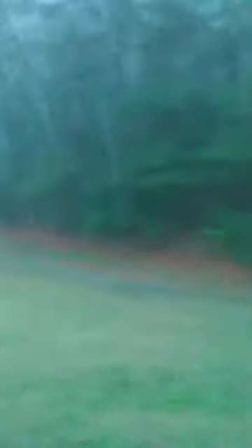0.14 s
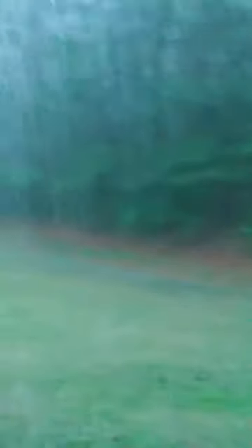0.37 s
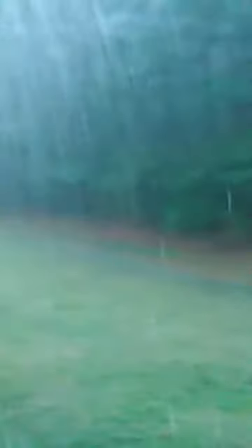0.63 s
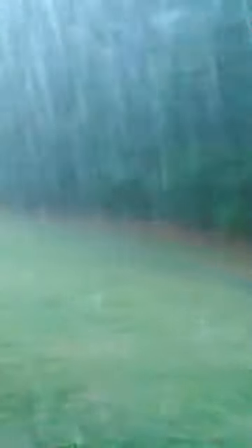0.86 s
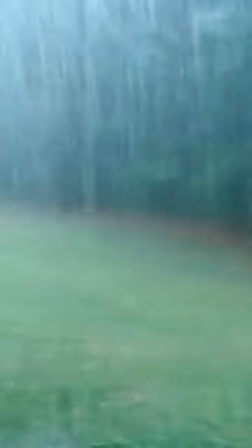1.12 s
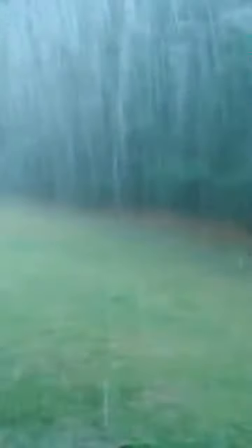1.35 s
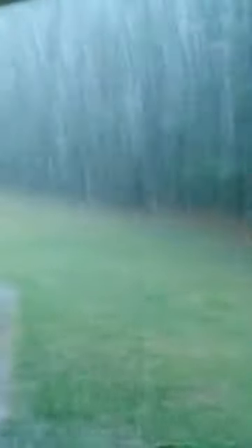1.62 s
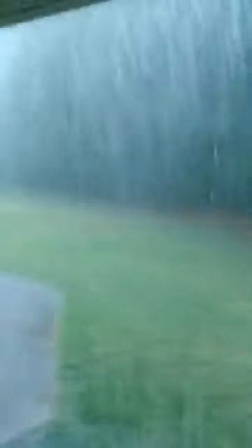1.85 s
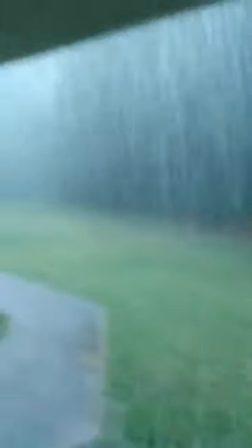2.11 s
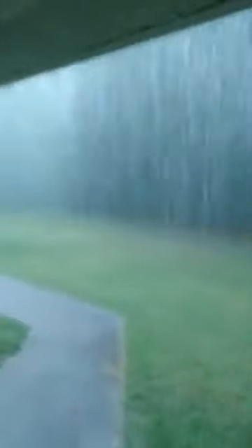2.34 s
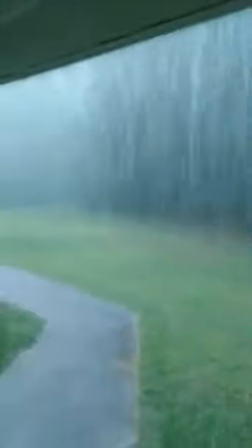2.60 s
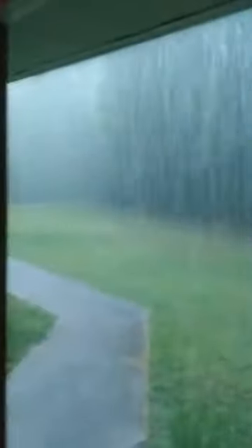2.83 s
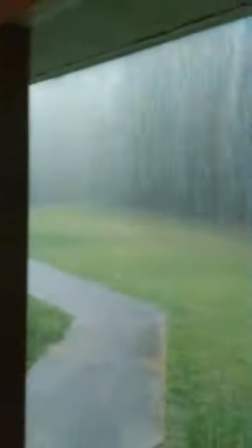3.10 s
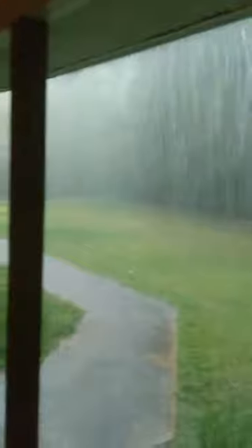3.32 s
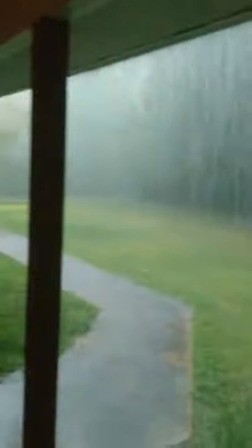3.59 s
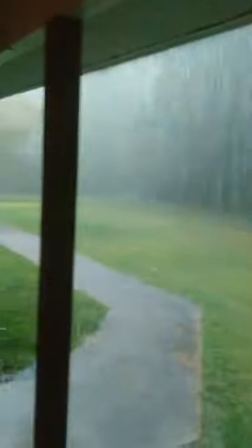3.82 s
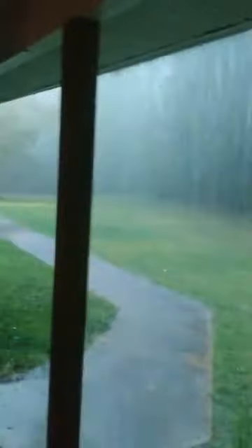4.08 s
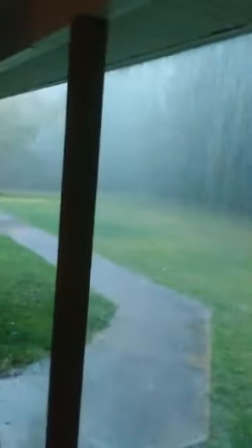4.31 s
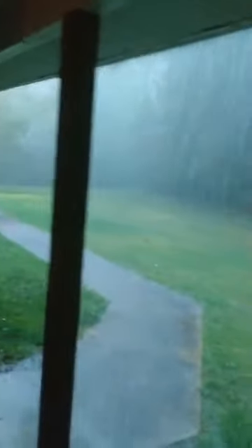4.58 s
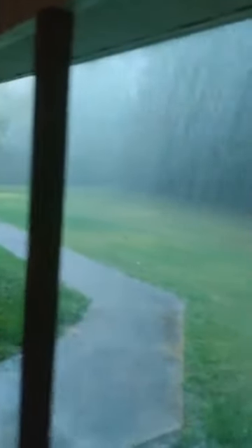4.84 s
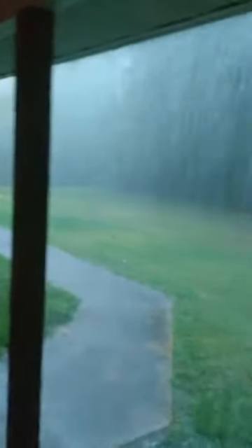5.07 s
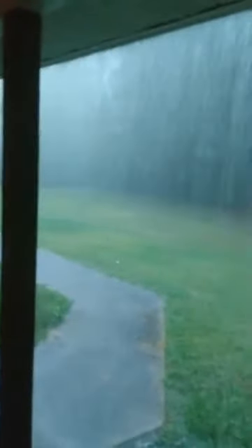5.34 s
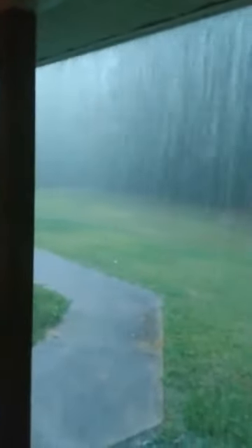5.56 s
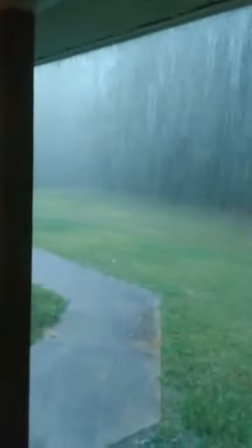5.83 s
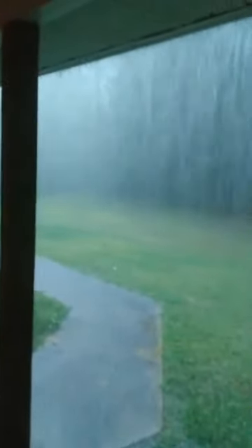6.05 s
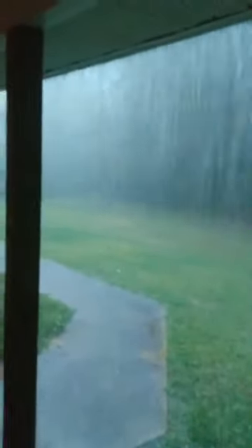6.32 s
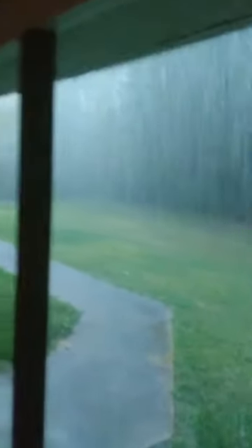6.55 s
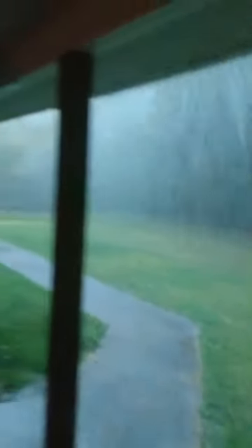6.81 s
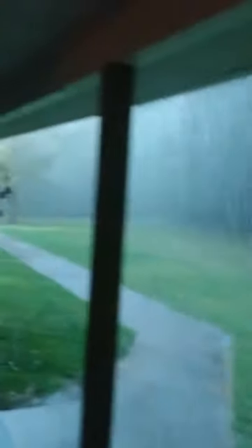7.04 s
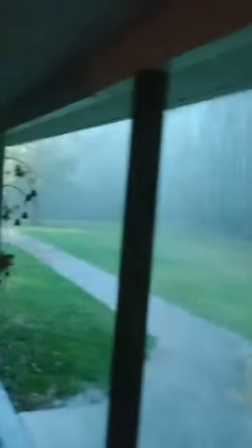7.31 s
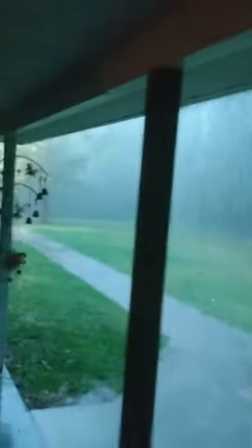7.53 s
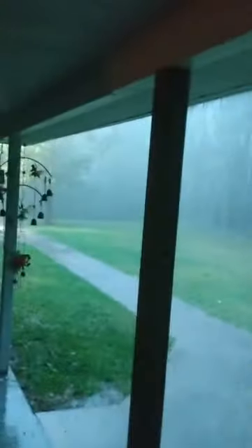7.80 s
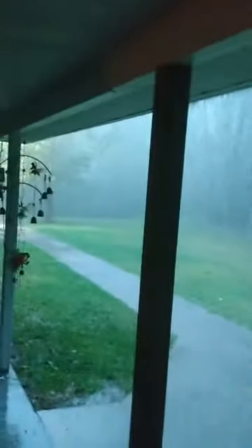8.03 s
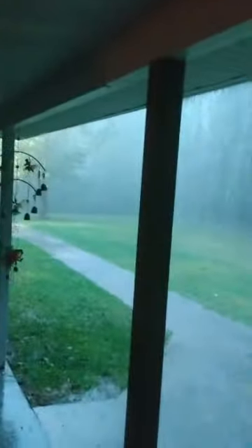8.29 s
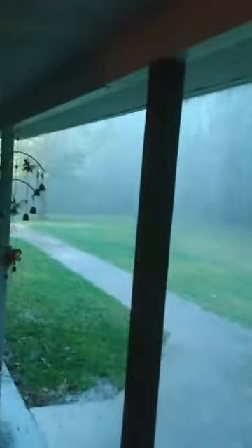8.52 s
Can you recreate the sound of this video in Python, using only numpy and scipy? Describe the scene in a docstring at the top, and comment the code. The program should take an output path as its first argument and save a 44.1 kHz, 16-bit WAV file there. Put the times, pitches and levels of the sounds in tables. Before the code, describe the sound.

A steady, loud downpour falls on grass, a paved path and trees, heard by a small handheld microphone under a porch roof. The dense bright hiss changes colour gradually as the microphone turns from open lawn to along the porch. Scattered close drops splat, faint ticks poke through, and two dull eaves drips fall early. Low wind buffets lightly, then thumps harder in the last second.

```python
"""Heavy rain from a porch

Heavy rain on a lawn, a path and trees, heard by one small microphone feeding two equal channels.
Far drops are noise, nearer ones random clicks; their hiss is recoloured as the microphone turns from lawn to porch.
Close drops, eaves drips and faint short ticks within the hiss are resonated noise bursts.
Wind on the microphone port is low noise with gusts and short swings, hardest near the end."""
import sys
import numpy as np
from scipy import signal
from scipy.fft import rfft, irfft, next_fast_len
from scipy.io import wavfile
from scipy.ndimage import uniform_filter1d

SR = 44100
rng = np.random.default_rng(int(sys.argv[2]) if len(sys.argv) > 2 else 0)


def linear_from_db(decibels):
    """Turn decibels (scalar or array-like) into linear amplitude factors; 0 gives 1."""
    return 10 ** (np.asarray(decibels, float) / 20)


def master(y):
    """Save y as 16-bit WAV."""
    cut = np.clip(np.atleast_2d(y).T, -1, 1)
    pcm = np.round(cut * 32767)  # scale
    wavfile.write(sys.argv[1], SR, pcm.astype(np.int16))


N = 381906

# Downpour. Each row: time in seconds, level in dB.
RAIN_LEVEL = [(0.0, -16), (1.76, -16.5), (6.46, -17.5), (7.45, -18), (8.59, -18), (8.66, -19.5)]
# Microphone heading. Each row: time in seconds, heading from 0 (open lawn) to 1 (along the porch).
MIC_HEADING = [(0, 0.02), (.5, 0.053), (1, 0.29), (1.5, 0.48), (2.5, 0.62), (4, 0.76), (6, 0.83), (8.66, 1)]
# Hiss colour facing the lawn. Each row: frequency in Hz, relative density in dB per Hz.
LAWN_COLOUR = [(190, -14), (330, -15.5), (630, -14), (1100, -10), (1700, -6), (2030, -1), (3100, -2),
               (4500, -3), (7900, -4), (8700, -3), (10000, -3.5), (11400, -3.5), (13200, -0.5),
               (14300, -1.5)]
# Hiss colour along the porch. Each row: frequency in Hz, relative density in dB per Hz.
PORCH_COLOUR = [(190, -34.5), (290, -18), (370, -20), (445, -16.5), (680, -13.5), (1450, -9), (1800, -4.5),
                (2300, 0.5), (2950, -2), (4200, -5.5), (7000, -6.5), (8000, -3.5), (9300, 1), (10400, -2),
                (12700, -3), (13800, -2.5), (14300, -7.5)]
# Narrow peaks and notches of the microphone port.
# Each row: centre in Hz, width in Hz, gain in dB facing the lawn, gain in dB along the porch.
PORT_RESONANCES = [(3060, 120, -1, -3), (3780, 110, -.5, -3.5), (4290, 140, -.5, -3),
                   (4560, 170, -.5, -3.3), (5280, 200, -.5, -1.3), (5770, 130, -1, -2.3),
                   (6050, 110, -1, -3), (6850, 160, -1, -1.5), (7560, 150, 0, -3.5), (8430, 260, -3.5, -2),
                   (9080, 300, -2.5, .5), (9580, 400, 4.5, 2.5), (9850, 120, -1.5, -3.5),
                   (10050, 150, -2, -3), (10520, 100, 0, -2), (11030, 100, -1, -2.5), (11350, 200, -1, -2),
                   (11870, 150, -2, -2), (12550, 140, -1.5, -2), (12800, 120, 0, -2.5),
                   (13550, 150, -.5, -2.5)]
# Thinning of the low body of the hiss. Each row: time in seconds, relative gain in dB.
LOW_BODY_GAIN = [(0, 0), (1.7, 1), (2.2, -2.5), (2.9, 0), (3.4, 0), (3.6, -6.5), (3.85, 0), (4.35, 0),
                 (4.6, -6), (4.8, 2), (5.1, -6), (5.3, 2), (5.75, -4), (6.0, -1), (6.3, -3), (6.5, -11),
                 (7.9, -11), (8.05, -3), (8.2, -9), (8.3, -3), (8.66, -4)]
# Colour level under which a narrow band drops out, before the margin shifts.
# Each row: frequency in Hz, level in dB against the mean of the hiss.
DROPOUT_LEVEL = [(280, -23), (400, -21), (500, -22), (1400, -13), (3000, -5), (7000, -4.5), (9000, -5),
                 (14000, -4.5)]
# Big drops landing close by. Each row: start in seconds, peak in dB before trim, ring in Hz.
CLOSE_DROPS = [(0.88, -6, 2400), (2.3155, -12, 2130), (2.754, -6, 2500), (3.144, -4, 2150),
               (3.9434, -7, 2340), (4.311, -6, 2220), (4.4139, -4, 2200), (5.21, -18, 3400),
               (6.08, -7, 2410), (6.9136, -3, 2550), (7.9134, -2.5, 2330), (8.154, -8, 2400),
               (8.236, -9, 2600), (8.54, -15, 2400)]
# Heavy, duller drips from the eaves. Each row: start in seconds, peak in dB before trim, ring in Hz.
EAVES_DRIPS = [(0.798, -20, 1000), (1.510, -17, 740)]
# Faint short ticks within the hiss, 3 to 7 kHz.
# Each row: start in seconds, peak in dB before trim, ring in Hz.
FAINT_TICKS = [(0.0947, -10, 4430), (0.5442, -12, 4840), (0.6799, -13, 3320), (0.7332, -12, 3650),
               (1.5454, -13, 4910), (1.8542, -14, 3490), (2.0303, -19, 4050), (2.1884, -9, 6890),
               (2.3496, -10, 3500), (2.9302, -15, 3280), (3.2201, -12, 4780), (3.3533, -15, 3000),
               (3.492, -6, 5090), (3.8282, -15, 5680), (4.3725, -15, 3990), (5.1382, -21, 3220),
               (5.3961, -13, 3240), (5.5832, -16, 3540), (5.8616, -12, 3580), (6.0392, -16, 5080),
               (6.098, -14, 3280), (6.7481, -13, 3020), (6.8643, -8, 3280), (7.3103, -16, 3500),
               (7.4689, -16, 3210), (7.5647, -9, 4100), (8.1539, -15, 6510), (8.3464, -16, 3580),
               (8.5405, -16, 3280), (8.6138, -18, 3550)]
# Steady wind on the port, before random swings.
# Each row: time in seconds, rumble level in dB, flutter in dB over the rumble.
STEADY_WIND = [(0.0, -55.5, 12.5), (1.2, -56.5, 7.5), (2.6, -51.5, 3.5), (4.2, -53.5, 3.5), (4.9, -52, 5),
               (5.3, -49, 0), (5.55, -61, 12), (5.76, -60, 0), (5.85, -50, 2), (6.3, -57, 5.5),
               (6.6, -47.5, -6), (6.9, -57, 1), (7.6, -50.5, -12), (8.66, -56, -17)]
# Buffeting colour. Each row: frequency in Hz, relative density in dB per Hz.
BUFFET_COLOUR = [(15, -50), (30, -18), (69, 0.5), (125, 2), (142, -7), (178, -5), (230, -8.5), (265, -17.5),
                 (340, -53), (730, -120)]
# Gusts reaching under the roof, before random swings.
# Each row: time of full strength in seconds, hold in seconds, rumble level in dB.
GUST_EVENTS = [(7.667, 0.1, -44), (7.993, 0.2, -47), (8.26, 0.094, -44), (8.5, 0.14, -41.5)]
# Single eddies thumping the port. Each row: start in seconds, peak in dB, frequency in Hz.
EDDY_THUMPS = [(2.309, -43, 153), (5.155, -35, 80), (5.285, -34, 105), (5.81, -36, 95), (5.965, -39, 85),
               (6.668, -30, 88.8), (7.674, -30, 157), (7.688, -30, 170), (7.719, -20.5, 96),
               (7.752, -33, 140), (7.79, -24, 113), (7.998, -29, 111), (8.044, -30, 144), (8.072, -33, 120),
               (8.105, -31, 85), (8.142, -32, 125), (8.254, -30, 134), (8.308, -24, 145), (8.324, -19, 135),
               (8.327, -27, 242), (8.354, -23, 108), (8.408, -37, 140), (8.497, -25, 100), (8.51, -39, 240),
               (8.517, -28, 118), (8.55, -32, 100), (8.594, -42, 110)]


def rms_one(x):
    """Scale to rms 1."""
    return x / np.sqrt(np.mean(x ** 2) + 1e-20)


def in_time(rows):
    """Read a curve of (seconds, value) at every sample."""
    s, value = np.transpose(rows)
    return np.interp(np.arange(N) / SR, s, value)


def at_hz(points, hz):
    """Read a spectrum on a log-frequency axis."""
    point_hz, point_db = np.transpose(points)
    return np.interp(np.log(hz + 1e-9), np.log(point_hz), point_db)


def drift(corner_hz):
    """Slow random curve: rms-1 noise at every 40th sample through a double one-pole low-pass."""
    pole = np.exp(-80 * np.pi * corner_hz / SR)
    noise = rng.standard_normal(N // 40 + 2002)
    slow = signal.lfilter([1], [1, -2 * pole, pole * pole], noise)[2000:]  # settled part
    return np.interp(np.arange(N) / 40, np.arange(len(slow)), rms_one(slow))


def field(shape, bins, frames):
    """Random time-frequency field of rms 1, smoothed across bins and twice across frames."""
    noise = uniform_filter1d(rng.standard_normal(shape), size=bins, axis=0)
    for _ in range(2):
        noise = uniform_filter1d(noise, size=frames, axis=1)
    return rms_one(noise)


def bell(hz, centre_hz, width_hz):
    """Gaussian over frequency, peak 1, full width taken at 1/e."""
    return np.exp(-(2 * (hz - centre_hz) / width_hz) ** 2)


def drops(rate_per_s=4000, mean_spread_db=5, patter_db=-5.5):
    """Far drops blur into noise; nearer ones stay single clicks of very uneven size."""
    size_db = mean_spread_db * np.minimum(rng.exponential(1, N), 4.0)
    clicks = linear_from_db(size_db) * rng.choice([-1, 1], N)
    landed = rng.random(N) < rate_per_s * linear_from_db(1.5 * drift(12)) / SR
    blur = rng.standard_normal(N)
    return blur + linear_from_db(patter_db) * rms_one(clicks * landed)


def rain(gust_db=0.11, patch_db=0.61, flicker_db=1.7, spray_db=1.0, spray_hz=8500):
    """Drops coloured by heading and port, swelling together, in broad patches and in narrow bands."""
    waver_db, dip_db, lawn_margin_db, notch_pull = 3.9, -32, 2.5, 1.45
    hz, s, heard = signal.stft(drops(), SR, nperseg=1024, noverlap=768)
    heading = np.clip(np.interp(s, *np.transpose(MIC_HEADING)), 0, 1)

    colour_db = np.outer(at_hz(LAWN_COLOUR, hz), 1 - heading) + np.outer(at_hz(PORCH_COLOUR, hz), heading)
    port_db = np.zeros(heard.shape)
    for centre_hz, width_hz, lawn_db, porch_db in PORT_RESONANCES:
        gain_db = lawn_db + (porch_db - lawn_db) * heading
        port_db += np.outer(bell(hz, centre_hz, width_hz), gain_db)
    low_body_db = np.interp(s, *np.transpose(LOW_BODY_GAIN))
    colour_db += port_db + np.outer(bell(hz, 305, 170), low_body_db)
    colour_db -= 10 * np.log10(np.mean(linear_from_db(colour_db) ** 2, axis=0))  # mean power 1 in each frame

    wobble_db = gust_db * field((1, len(s)), 1, 3) + patch_db * field(heard.shape, 50, 3)
    wobble_db += flicker_db * field(heard.shape, 2, 8)
    treble = 1 / (1 + (spray_hz / (hz[:, None] + 1)) ** 6)
    wobble_db += spray_db * field(heard.shape, 50, 3) * treble  # fine spray in puffs

    # narrow bands already weak drop out briefly: less facing the lawn, more in the port notches
    margin_db = colour_db + waver_db * field(heard.shape, 3, 10) - at_hz(DROPOUT_LEVEL, hz)[:, None]
    margin_db += lawn_margin_db * (1 - heading) + notch_pull * np.minimum(port_db, 0)
    dips_db = dip_db * np.clip(-margin_db / 3, 0, 1)

    shaped = heard * linear_from_db(colour_db + wobble_db + dips_db)
    hiss = signal.istft(shaped, SR, nperseg=1024, noverlap=768)[1][:N]
    return linear_from_db(in_time(RAIN_LEVEL)) * rms_one(hiss)


def ringing_bursts(rows, burst_s, width_hz, trim_db, snap):
    """Each event is a snap and a decaying noise burst through a resonator at its own pitch."""
    out, t = np.zeros(N), np.arange(SR // 25) / SR
    bursts = rng.standard_normal((len(rows), len(t))) * np.exp(-t / burst_s)
    bursts[:, 0] = -snap  # the first sample
    pole = np.exp(-np.pi * width_hz / SR)
    for (s, peak_db, hz), burst in zip(rows, bursts):
        poles = [1, -2 * pole * np.cos(2 * np.pi * hz / SR), pole * pole]
        ring = signal.lfilter([1, 0, -1], poles, burst)
        ring *= linear_from_db(peak_db + trim_db) / np.abs(ring).max()
        at = round(s * SR)
        out[at:at + len(t)] += ring[:N - at]
    return out


def close_splats():
    """Big drops close by: short bursts with a broad ring."""
    return ringing_bursts(CLOSE_DROPS, burst_s=0.0079, width_hz=600, trim_db=-7.5, snap=6.0)


def eaves_drips():
    """Heavy drips: a strong snap and a low, narrower ring."""
    return ringing_bursts(EAVES_DRIPS, burst_s=0.008, width_hz=220, trim_db=1.0, snap=25.0)


def faint_ticks():
    """Faint short ticks within the hiss: very short bursts, heavily damped."""
    return ringing_bursts(FAINT_TICKS, burst_s=0.0006, width_hz=2500, trim_db=-2.0, snap=3.0)


def thumps(width_s=0.0146):
    """Each strong eddy pushes the membrane through a few swings that swell and die."""
    out, t = np.zeros(N), np.arange(N) / SR
    phases = rng.uniform(0, 2 * np.pi, len(EDDY_THUMPS))
    for (s, peak_db, hz), phase in zip(EDDY_THUMPS, phases):
        near = slice(max(round((s - 0.1) * SR), 0), round((s + 0.2) * SR))
        late_s = t[near] - s - width_s / 2  # from the middle of the swell
        swell = linear_from_db(peak_db) * np.exp(-(2 * late_s / width_s) ** 2)
        out[near] += swell * np.sin(2 * np.pi * hz * late_s + phase)
    return out


def gust_gain(rise_s=0.03, fall_db_per_s=70):
    """Gain of the gusts: each rises fast, holds and dies away exponentially."""
    full_s, hold_s, level_db = np.transpose(GUST_EVENTS)[:, :, None]
    late_s = np.arange(N) / SR - full_s
    rise = np.clip(late_s / rise_s + 1, 0, 1) ** 2
    fall_db = fall_db_per_s * np.maximum(late_s - hold_s, 0)
    return np.sum(rise * linear_from_db(level_db - fall_db), axis=0)


def wind(lumpy_db=1.0, wander_db=1.0, split_hz=130, gust_flutter_db=-2.5):
    """Eddies over the port: low noise in lumps, whose upper flutter comes and goes."""
    size = next_fast_len(N)
    hz = np.arange(size // 2 + 1) * SR / size
    eddies = rfft(rng.standard_normal(size)) * linear_from_db(at_hz(BUFFET_COLOUR, hz))
    rumble = rms_one(irfft(eddies * (hz < split_hz), size)[:N])
    flutter = rms_one(irfft(eddies * (hz >= split_hz), size)[:N])
    s, rumble_db, flutter_db = np.transpose(STEADY_WIND)
    steady = linear_from_db(wander_db * drift(3.5)) * rumble + linear_from_db(in_time(np.c_[s, flutter_db])) * flutter
    steady *= linear_from_db(in_time(np.c_[s, rumble_db]))
    gusty = gust_gain() * (rumble + linear_from_db(gust_flutter_db) * flutter)
    return linear_from_db(lumpy_db * drift(18.0)) * (steady + gusty)


def scene():
    """One microphone feeds both channels."""
    rain_heard = rain() + close_splats() + eaves_drips() + faint_ticks()
    return np.tile(rain_heard + wind() + thumps(), (2, 1))


def top_cut(x):
    """Nothing passes above the cut-off."""
    return signal.sosfilt(signal.butter(12, 15370, fs=SR, output="sos"), x)


def record(dry):
    """A steep elliptic low-pass cuts the top of the mix."""
    low_pass = signal.ellip(13, 0.5, 90, 14230, fs=SR, output="sos")  # ripple dB, stop dB, cutoff Hz
    mix = signal.sosfilt(low_pass, dry)
    return top_cut(mix)


dry = scene()
out = record(dry)
master(out)
```